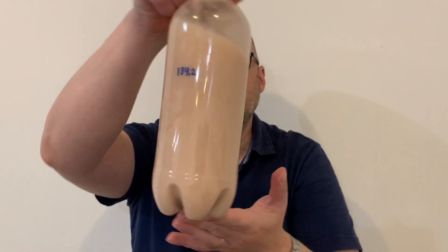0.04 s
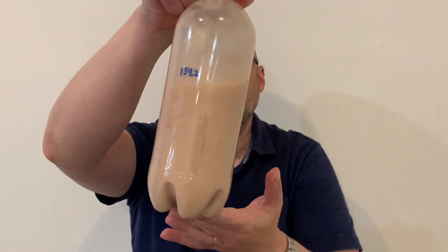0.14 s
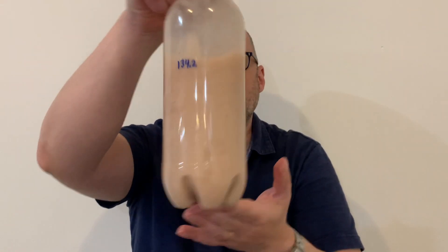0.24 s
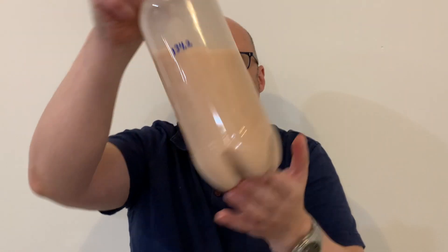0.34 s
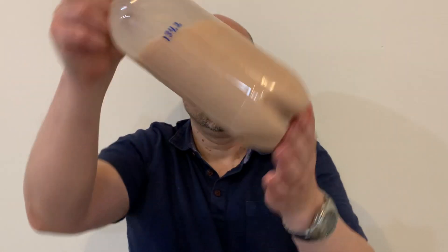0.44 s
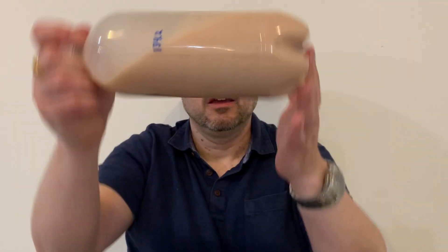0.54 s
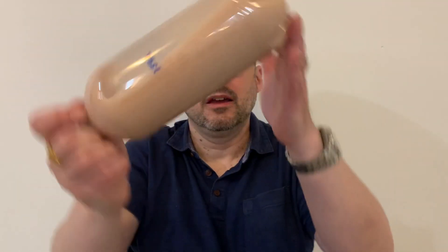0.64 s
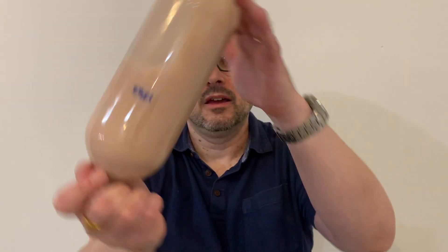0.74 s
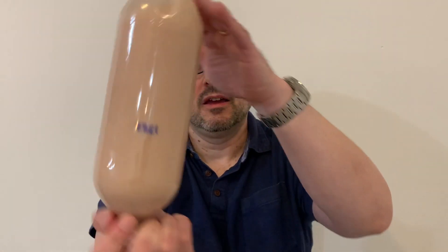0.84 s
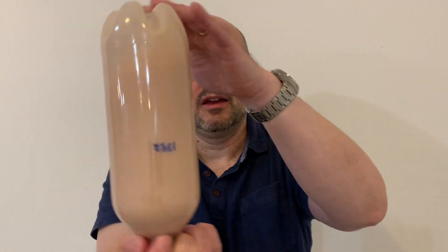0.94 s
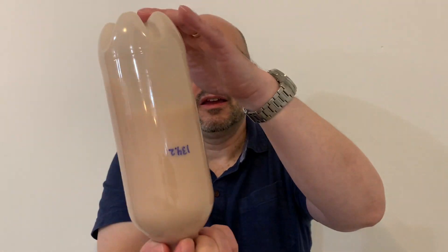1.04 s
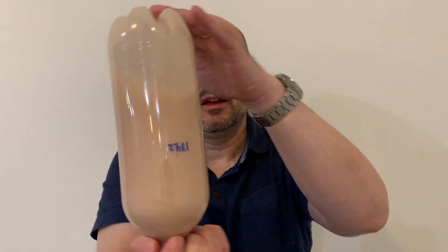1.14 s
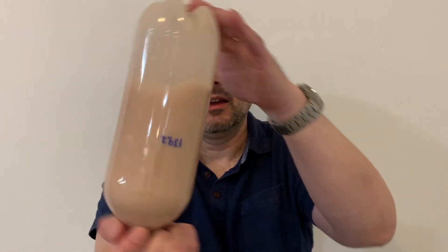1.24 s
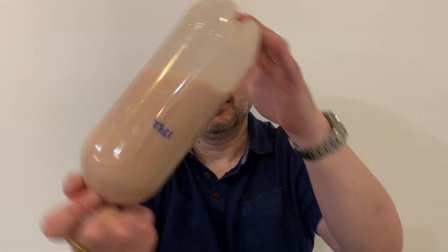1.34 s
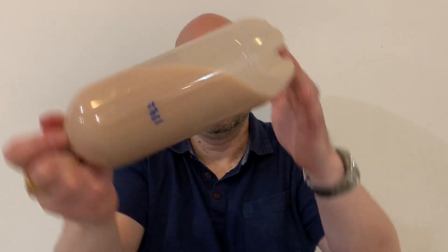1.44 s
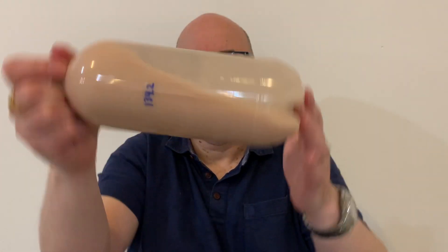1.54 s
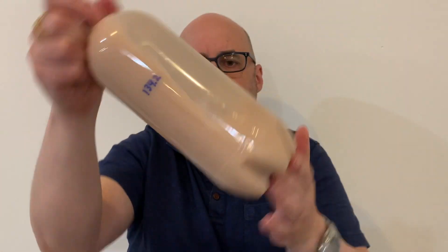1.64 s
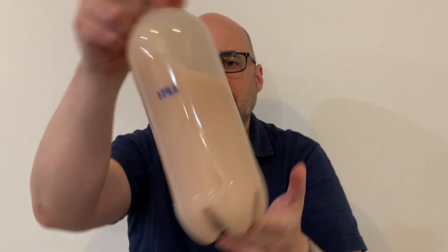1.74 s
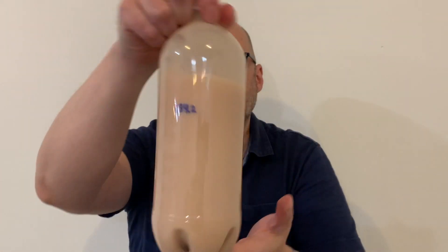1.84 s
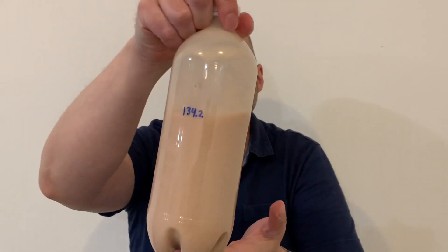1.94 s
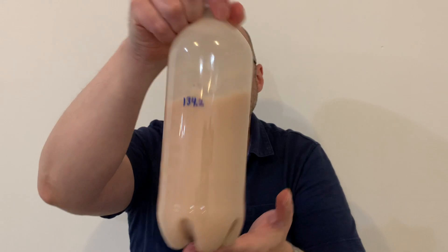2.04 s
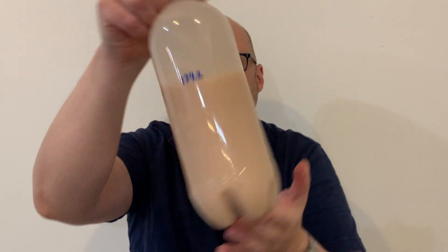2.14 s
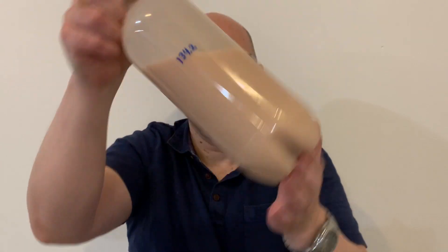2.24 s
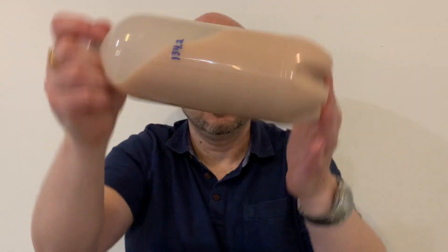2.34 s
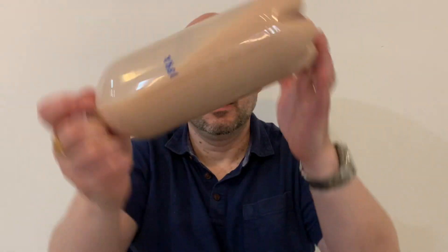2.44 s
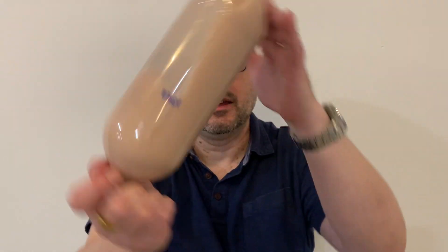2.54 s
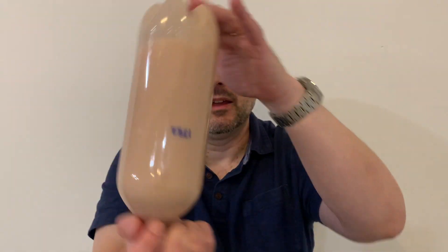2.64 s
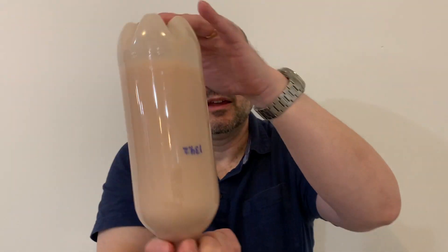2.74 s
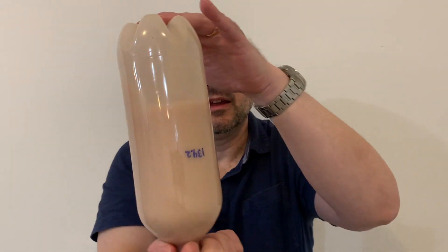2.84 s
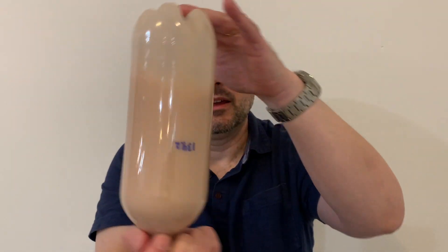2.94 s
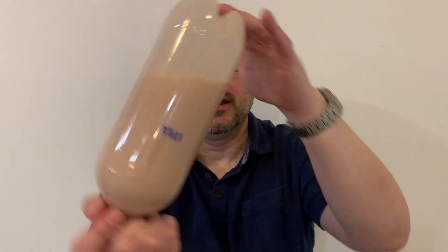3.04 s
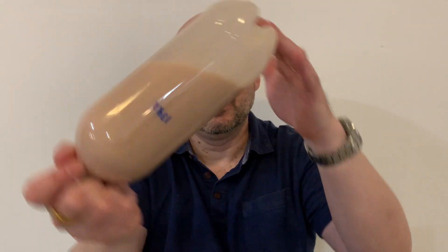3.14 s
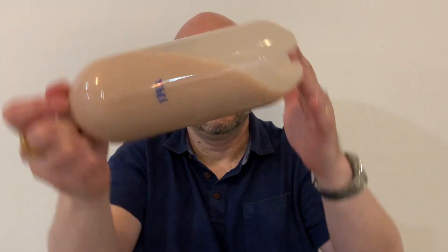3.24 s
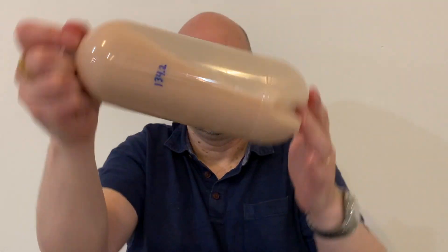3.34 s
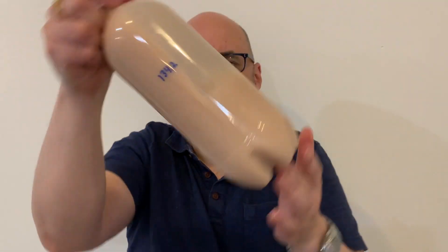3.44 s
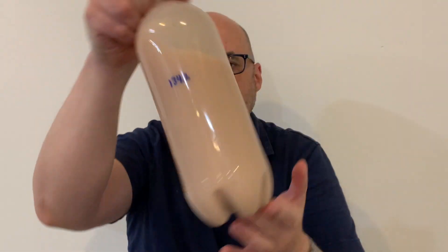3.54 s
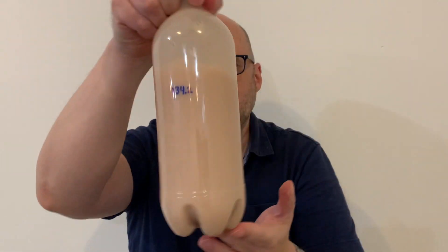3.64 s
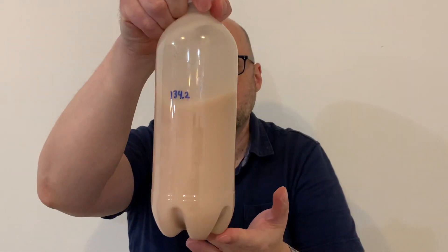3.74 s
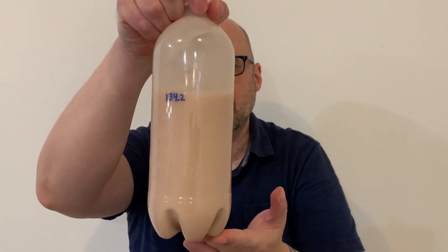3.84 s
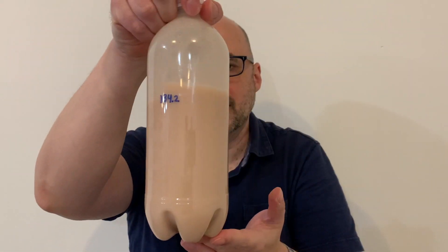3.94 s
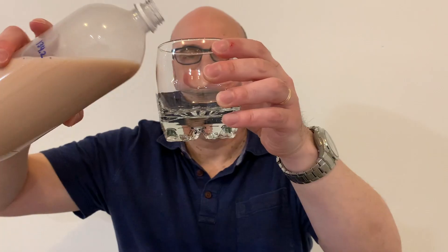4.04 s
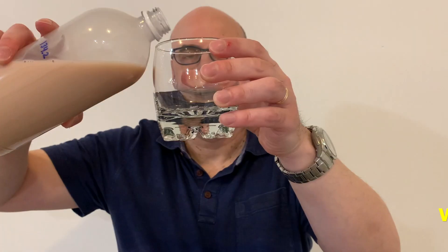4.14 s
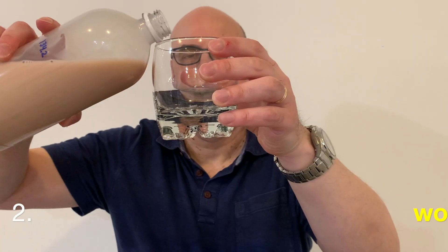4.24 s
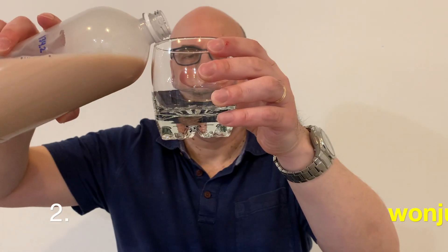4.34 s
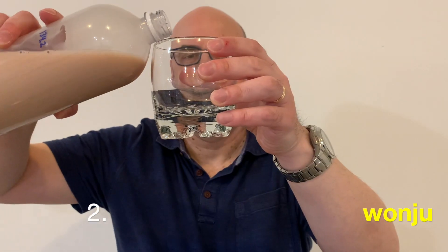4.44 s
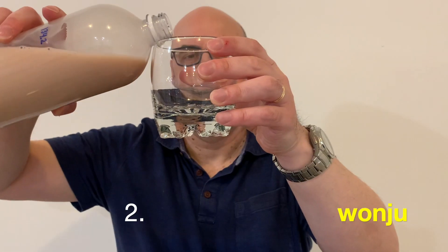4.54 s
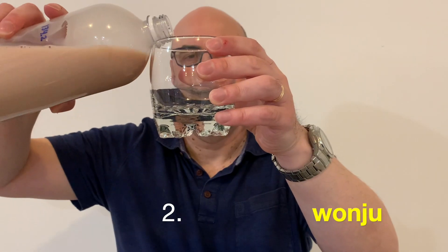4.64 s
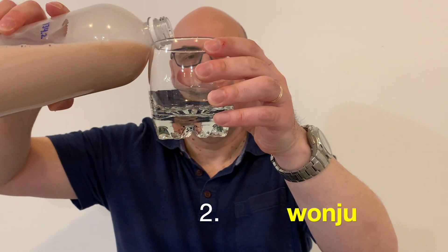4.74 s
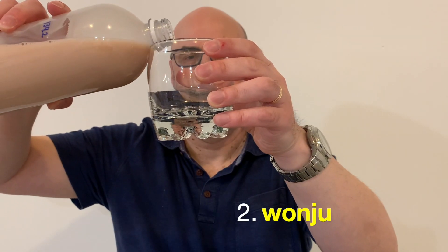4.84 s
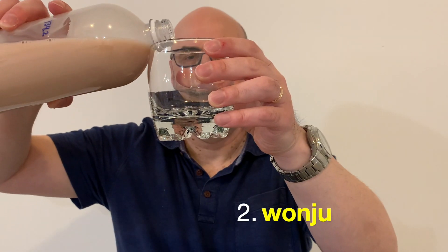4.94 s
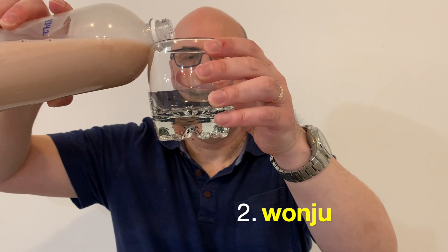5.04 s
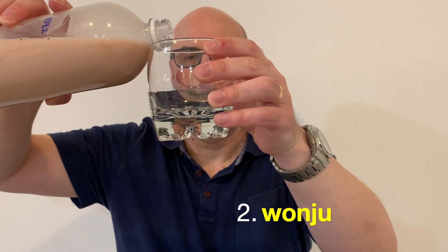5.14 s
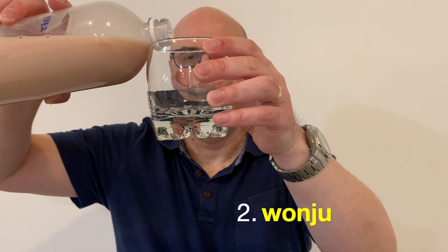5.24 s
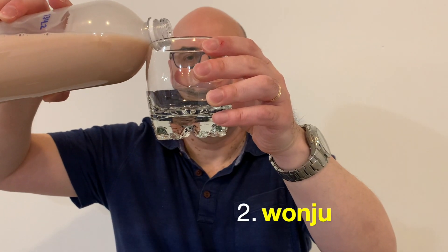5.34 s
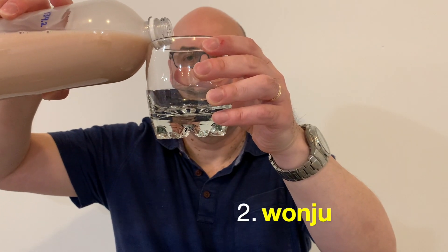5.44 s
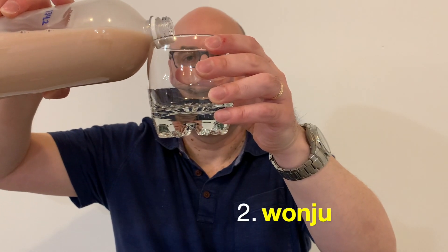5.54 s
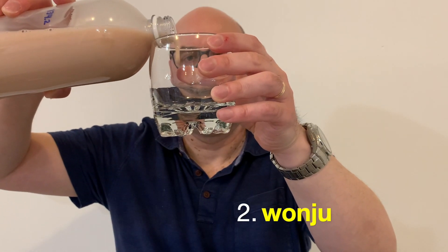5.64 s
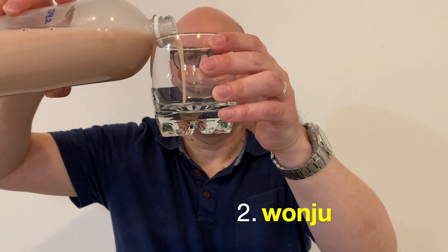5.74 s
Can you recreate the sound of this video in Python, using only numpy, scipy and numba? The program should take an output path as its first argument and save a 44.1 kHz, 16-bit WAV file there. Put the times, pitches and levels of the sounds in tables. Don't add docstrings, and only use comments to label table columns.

```python
import sys
import numpy as np
from scipy import signal
from scipy.fft import rfft, irfft
from scipy.io import wavfile
from scipy.ndimage import uniform_filter1d
from numba import njit

SR = 44100
rng = np.random.default_rng(int(sys.argv[2]) if len(sys.argv) > 2 else 0)


def boost_factor(decibels):
    exponent = np.asarray(decibels, float) / 20
    return 10 ** exponent


def dump_mix(stems):
    frames = np.atleast_2d(stems).T
    limited = np.clip(frames, -1, 1)
    pcm = np.round(limited * 32767).astype(np.int16)
    wavfile.write(sys.argv[1], SR, pcm)


N = 255763
T = np.arange(N) / SR
HZ = np.fft.rfftfreq(N, 1 / SR)


def unit(x):
    return x / np.sqrt(np.mean(x ** 2))


def over_hz(table):
    hz, value = np.transpose(table)
    return np.interp(np.log(HZ + 1), np.log(hz + 1), value)


def band(hz, width):
    shape = 1 / (1 + ((HZ - hz * hz / (HZ + 1)) / width) ** 2)
    return unit(irfft(rfft(rng.standard_normal(N)) * shape, N))


def walk(rate):
    k = int(SR / rate)
    steps = np.repeat(rng.standard_normal(N // k + 1), k)
    return unit(uniform_filter1d(uniform_filter1d(steps, k), k)[:N])


def spread(likeness):
    mid, side = rfft(rng.standard_normal((2, N)))
    c = np.clip(likeness, 0, 1)
    return np.sqrt(1 + c) * mid + np.sqrt(1 - c) * side * np.array([[1], [-1]])


@njit
def rings(start, hz, t60, size, glide, rise):
    out = np.zeros(N)
    for k in range(len(start)):
        span = t60[k] * SR
        fall, faster = 1000. ** (-.5 / span), 1000. ** (-1.5 / span ** 2)
        phase, a = 0., size[k]
        for i in range(min(int(span), N - start[k])):
            phase += 2 * np.pi * hz[k] * (1 + glide * i / span) / SR
            a, fall = a * fall, fall * faster
            swell = min(1., i * hz[k] / (rise * SR))
            out[start[k] + i] += a * swell * np.sin(phase)
    return out


def ring(s, hz, t60, db, glide, rise):
    return rings((s * SR).astype(np.int64), hz, np.clip(t60, .002, 1), boost_factor(db), glide, rise)


def burst(size, hz, share, t60, top_db, noise):
    t, f = np.arange(size) / SR, np.fft.rfftfreq(size, 1 / SR) + 1
    spectrum = rfft(noise)
    sputter = boost_factor(3.3 * unit(irfft(spectrum / (1 + (f / 120) ** 2))))
    width = hz * max(share, .03)
    body = unit(irfft(spectrum / (1 + ((f - hz * hz / f) / width) ** 2) ** 1.3))
    top = boost_factor(top_db) * unit(irfft(spectrum / (1 + (10500 / f) ** 8)))
    fall = np.exp(-np.log(1000) * t / max(t60, .004))
    body *= sputter * fall
    body *= 1.1 * np.sqrt(np.sum(fall ** 2) / np.sum(body ** 2))
    attack = np.minimum(t / min(0.0018, 3 / hz), 1)
    return (body + top * fall ** 2) * attack / 2.22


def puffs(rows):
    size = 8192
    out = np.zeros(N + size)
    for (s, db, hz, share, t60, top_db), noise in zip(rows, rng.standard_normal((len(rows), size))):
        start = int(s * SR)
        out[start:start + size] += boost_factor(db) * burst(size, hz, share, t60, top_db, noise)
    return out[:N]


# (time [s], peak [dB], pitch [Hz], splash over pop [dB])
POPS = [(0.054, -33, 774, 1), (0.111, -32, 1114, -2), (0.154, -52, 1665, 0), (0.184, -51.5, 1950, 1),
        (1.577, -26.5, 620, -14), (1.615, -12.5, 537, -14.5), (1.6167, -18.5, 1040, -23.5),
        (1.621, -19, 705, -16.5), (1.63, -24, 870, -21), (1.626, -9.5, 825, -20),
        (1.652, -40, 940, 2.5), (1.685, -30, 1275, -5), (1.698, -38, 1180, 1),
        (1.728, -33.5, 1446, -1), (1.852, -28, 1010, -2.5), (3.289, -55.5, 717, 4),
        (3.354, -22.5, 635, -13), (3.4024, -12, 680, -20), (3.449, -36, 2180, -5),
        (3.4708, -21.5, 1310, -14.5), (3.473, -19.5, 1170, -19.5), (3.521, -36.5, 940, -4.5),
        (3.616, -56, 1160, 2), (3.666, -33.5, 880, -5.5), (3.697, -47.5, 1055, 11),
        (3.842, -60, 1120, 0), (4.696, -45.5, 503, 2), (4.926, -41.5, 730, -1),
        (0.709, -26.5, 884, -23), (0.769, -28, 752, -11), (0.82, -49, 1450, -1),
             (0.86, -44, 1124, 2.5), (0.921, -44, 1294, -13), (0.963, -52, 945, 8.5),
             (1.038, -49, 860, -13), (2.47, -39.5, 904, -11), (2.492, -48, 700, 13.5),
             (2.506, -37.5, 820, -20), (2.534, -41, 830, -13), (2.552, -47.5, 1190, 4.5),
             (2.579, -54, 710, -10), (2.601, -45, 780, 6.5), (2.639, -47, 1230, 7.5),
             (2.749, -41.5, 1050, 4.5), (2.808, -41, 1090, -1), (2.851, -30, 1230, -24),
             (2.87, -38, 1274, -8), (2.904, -45, 840, -2)]
# (pitch ratio, level [dB])
PARTIALS = [(1.5, -13), (0.47, -11), (1.6, -27.5)]


def pops():
    s, db, hz, splash_db = np.transpose(POPS)
    s = s + 0.000966
    t60 = 0.03 * boost_factor(-0.27 * (db + 39.5))
    out = ring(s, hz, t60, db, 0.14, 1.1)
    for ratio, part_db in PARTIALS:
        detune = 1 + 0.11 * rng.standard_normal(len(s))
        out += ring(s, hz * ratio * detune, t60 / 2, db + part_db, -0.058, 0.28)
    return out + puffs([(a, b, 1.097 * c, 1.4, 0.1, -50) for a, b, c in zip(s, db + splash_db, hz)])


# (time [s], peak [dB], pitch [Hz], ring t60 [s])
THUMPS = [(0.707, -39, 307, 0.2), (0.769, -26.5, 467, 0.034), (1.578, -32, 364.6, 0.18),
          (1.629, -19, 190, 0.017), (2.491, -29.5, 278, 0.12), (2.533, -35.5, 362, 0.061),
          (2.75, -37.5, 406, 0.072), (2.907, -42.5, 413, 0.055), (3.355, -27.5, 357.7, 0.18),
          (3.402, -18.5, 445, 0.045), (4.7, -31, 239.4, 0.32), (4.926, -45.5, 244, 0.12)]


def thumps():
    s, db, hz, t60 = np.transpose(THUMPS)
    first = ring(s, hz, 0.69 * t60, db, 0.019, 1.7)
    return first + ring(s, 1.2 * hz, 0.71 * t60, db - 11.0, 0.0088, 0.52)


def swarm(rate, low_hz, high_hz, cycles, scatter_db, tilt_db):
    when, size, loud, life = rng.random((int(rate * N / SR), 4)).T
    hz = low_hz * (high_hz / low_hz) ** size
    db = -scatter_db * np.log(1.01 - loud) + tilt_db * size
    return unit(ring(when * (N - 1) / SR, hz, cycles * (0.72 + life) / hz, db, 0.088, 0.28))


def waves(s, hold, db, t60):
    s, hold, db = s[:, None], hold[:, None], db[:, None]
    rise = np.clip((T - s) / 0.029 + 1, 0, 1)
    return np.sum(rise * boost_factor(db - 60 * np.maximum(T - s - hold, 0) / t60), axis=0)


# (time [s], hold [s], bubbling [dB], spray [dB])
WAVES = [(0.022, .13, -57.5, -65.5), (0.728, 0.068, -50.5, -60.5), (0.868, 0.022, -71, -71.5),
         (0.93, 0.077, -58, -67.5), (1.612, 0.1, -58, -59), (1.716, 0.1, -62.5, -70),
         (1.849, 0.07, -55, -63.5), (2.481, 0.026, -59, -66), (2.57, 0.11, -57, -67),
         (2.734, 0.13, -58.5, -71.5), (3.391, 0.15, -61.5, -63), (3.644, 0.059, -56.5, -71.5),
         (0.21, 0.15, -81, -93), (1.026, 0.046, -75, -92), (1.464, .1, -74, -96),
         (2.02, 0.066, -75.5, -81.5), (2.925, 0.11, -76.5, -101), (3.302, 0.042, -73, -87),
         (3.475, 0.029, -59.5, -62.5), (3.685, 0.046, -70.5, -65.5), (3.76, 0.14, -82, -98),
         (4.93, .06, -84, -89)]


def froth():
    s, hold, bubble_db, spray_db = np.transpose(WAVES)
    flow = 1.5 * walk(40)
    bubble_gain = waves(s, hold, bubble_db, 0.28) * boost_factor(flow + 2 * walk(50))
    spray_gain = waves(s, hold, spray_db, 0.13) * boost_factor(flow + 3 * walk(60))
    mist_gain = waves(s, hold, spray_db - 14.5, 0.1) * boost_factor(flow + 5 * walk(30))
    bubbles = swarm(800, 650, 2700, 18, 2.8, -3) + boost_factor(-2.0) * band(1300, 1900)
    spray = swarm(800, 2396, 7920, 30, 1.31, -12) + boost_factor(-14.0) * band(7900, 6000)
    mist = swarm(810, 6600, 13000, 48.5, 1.6, -5.5) + boost_factor(-18.0) * band(13790, 7938)
    return boost_factor(-1.5) * bubble_gain * bubbles + boost_factor(5.5) * spray_gain * spray + boost_factor(8.0) * mist_gain * mist


# (time [s], peak [dB], pitch [Hz], ring t60 [s])
DROPS = [(0.037, -29, 1593, 0.045), (3.4008, -23.5, 1083, 0.012), (0.303, -52, 1566, 0.028),
         (0.408, -52.5, 2250, 0.015), (0.764, -39, 2370, 0.026), (0.793, -50, 3950, 0.039),
         (0.9598, -45, 1795, 0.048), (1.083, -46, 2680, 0.021), (1.085, -53, 704, 0.04),
         (1.563, -54, 2730, 0.038), (1.649, -33, 2300, 0.03), (1.7344, -53, 1630, 0.072),
         (1.9296, -45, 2190, 0.032), (2.574, -46.5, 1810, 0.03), (2.603, -38.5, 2670, 0.024),
         (2.735, -40, 2020, 0.031), (2.761, -54, 1747, 0.044), (2.779, -39.5, 1620, 0.035),
         (2.901, -41, 1804, 0.045), (2.998, -58, 1770, 0.048), (3.055, -57.5, 2005, 0.021),
         (3.402, -35, 2310, 0.016), (3.4315, -42, 2174, 0.04), (3.565, -38, 1310, 0.024),
         (3.5772, -40.5, 1635, 0.025), (3.775, -43.5, 2117, 0.015), (3.905, -63, 3980, 0.036),
         (4.161, -56, 1123, 0.032), (5.159, -58, 3230, 0.052), (5.163, -53.5, 883, 0.072),
         (0.74, -39, 4100, 0.033), (.74, -40, 4700, 0.033), (.878, -58, 1960, .03),
         (.893, -49, 1580, 0.062), (.944, -47, 1040, 0.035), (.984, -44, 2010, 0.037),
         (1.013, -52, 1820, .04), (1.044, -52.5, 2100, 0.028), (1.604, -57, 1080, 0.017),
         (1.745, -42, 1365, 0.033), (2.583, -45.5, 1900, 0.018), (2.624, -49, 1210, .03),
         (2.672, -49, 800, 0.043), (2.69, -64, 900, 0.029), (2.859, -45, 910, .03),
         (2.958, -62, 1480, 0.034), (3.387, -48, 1084, 0.018), (3.411, -46, 1100, 0.024),
         (3.484, -50, 1214, 0.046), (2.658, -58, 6750, 0.018)]


def drops():
    s, db, hz, t60 = np.transpose(DROPS)
    spray = puffs([(a, b - 5.5, c, .45, 0.089, -50) for a, b, c in zip(s, db, hz)])
    return ring(s, hz, t60, db, 0.068, 1.0) + spray


# (time [s], peak [dB], pitch [Hz], ring t60 [s])
BLIPS = [(.724, -45, 3030, .02), (.782, -45, 1970, .025), (.875, -49, 2580, .015), (1.353, -64, 3080, .02),
         (1.452, -63, 1500, 0.017), (1.483, -62.5, 1200, 0.026), (1.499, -59, 1050, .03),
         (1.525, -54, 1100, 0.019), (1.546, -55, 900, .025), (1.603, -49, 2530, 0.014),
         (1.622, -32, 2380, .02), (1.663, -38, 3330, 0.016), (1.663, -39, 4220, .015),
         (1.711, -40, 2390, .02), (1.948, -51, 2800, 0.017), (1.972, -57, 2220, .04),
         (2.037, -47, 2220, 0.024), (2.491, -39, 1500, 0.017), (2.508, -50, 2610, 0.016),
         (2.551, -46, 1690, .025), (2.748, -42, 690, 0.033), (2.955, -58, 1300, 0.026),
         (2.998, -58, 940, 0.027), (3.368, -50, 1300, 0.011), (3.437, -40, 2970, 0.022),
         (3.471, -27, 2390, .015), (3.473, -47, 3900, .03), (3.489, -53, 5630, .02),
         (3.492, -44, 6400, 0.021), (3.614, -48, 1970, 0.017), (3.697, -51, 3980, .02),
         (3.701, -52, 5020, .02), (3.728, -46, 2610, .02), (3.814, -59, 1300, .03), (3.904, -56, 3990, .02),
         (1.76, -44, 4250, .02), (.135, -48, 3790, .02), (4.707, -48, 6000, .015)]


def blips():
    s, db, hz, t60 = np.transpose(BLIPS)
    return ring(s, hz, t60, db, .05, 1.5)


# (time [s], peak [dB], centre [Hz], width share, t60 [s])
SLAPS = [(0.126, -39.5, 9200, 0.34, 0.041), (.214, -55, 9000, 1.5, .012), (.239, -53, 10300, 0.57, 0.017),
         (.607, -60, 4300, .8, 0.23), (3.633, -43, 9300, 0.21, 0.053), (5.158, -70, 3008, 1.46, 0.051),
         (0.624, -37.5, 4400, .7, 0.011), (1.663, -24.5, 15000, 0.18, 0.013),
         (2.0066, -34, 2200, 0.8, 0.023), (2.009, -39, 1940, 0.52, 0.18), (3.386, -34.5, 14400, 1.2, 0.008),
         (3.532, -29, 14900, 0.25, 0.007), (4.047, -55.5, 2420, 1.54, 0.015), (4.699, -49, 1200, 2.6, 0.1),
         (4.933, -54, 6000, 2.4, 0.08), (4.926, -42.5, 496, 1.2, 0.2)]


def slaps():
    return puffs([(*row, -33.5) for row in SLAPS])


# (time [s], peak [dB], centre [Hz], width [Hz])
SNAPS = [(.188, -48, 2200, 2500), (.41, -43, 4070, 1500), (0.6262, -43, 5000, 4000),
         (0.74, -37, 7500, 3000), (.769, -44, 5080, 1200), (1.354, -46, 1800, 2000),
         (1.517, -39, 3000, 4000), (1.58, -41, 3500, 5000), (1.664, -26, 8700, 2500),
         (1.872, -44, 11000, 9000), (1.872, -44, 2500, 2500), (2.472, -37, 9000, 7000),
         (2.485, -45, 9000, 7000), (2.571, -37, 11000, 6000), (2.604, -44, 12500, 6000),
         (2.903, -35, 9000, 7000), (3.2902, -48, 5600, 1300), (3.2915, -45, 3500, 6000),
         (3.387, -46, 6000, 6000), (3.474, -38, 7300, 3000), (3.481, -37, 8300, 1994),
         (3.568, -46, 4800, 2000), (4.701, -39, 3400, 5100), (4.926, -42, 1100, 1200),
         (2.0067, -22, 1850, 600), (4.926, -46, 6000, 6000), (4.699, -41, 6500, 3000),
         (.128, -42, 7000, 5000)]


def snaps():
    out, t = np.zeros(N), T[:256]
    for s, db, hz, width_hz in SNAPS:
        start, pace = int(s * SR), 5 * width_hz * t
        out[start:start + len(t)] += boost_factor(db) * pace * np.exp(1 - pace) * np.sin(2 * np.pi * hz * t)
    return out


# (time [s], peak [dB], centre [Hz], t60 [s])
SPATTERS = [ (0.706, -51, 5970, 0.028), (0.737, -42, 4400, 0.08), (0.96, -43, 7600, 0.087),
            (1.514, -41.5, 6600, 0.016), (1.5784, -56, 6900, 0.037), (1.614, -40, 5800, 0.057),
            (1.761, -49, 4080, 0.18), (1.921, -45, 5414, 0.019), (2.0072, -59, 3270, 0.061),
            (2.4705, -41, 4670, 0.067), (2.566, -41, 3720, 0.053), (2.674, -41.5, 4500, 0.023),
            (2.761, -48, 5380, 0.071), (2.851, -50, 5800, 0.041), (2.899, -52, 4740, 0.07),
            (3.356, -55, 6660, 0.036), (3.402, -37, 4440, 0.037), (3.564, -50.5, 4730, 0.08),
            (3.6745, -55, 6560, 0.049), (3.699, -40.5, 6660, 0.03), (3.904, -63, 4000, 0.04),
            (4.697, -38.5, 4600, 0.018)]


def spatters():
    rows = []
    for s, db, hz, t60 in SPATTERS:
        share = max(.14, 0.67 * boost_factor(2 * (db + 40.0)))
        rows.append((s, db, hz, share, t60, -28.5))
    return puffs(rows)


# (time [s], peak [dB], centre [Hz], top octave [dB])
CREAKS = [(0.1256, -45, 3660, -8), (0.409, -52.5, 3850, 3), (0.768, -43, 5550, 1),
          (0.836, -44.5, 5900, 6.5), (0.923, -56.5, 4000, 20), (1.661, -39, 7100, -41),
          (1.8473, -50, 5250, -30), (1.869, -41, 7200, -54), (2.602, -51.5, 3840, 12), (3.29, -55, 5730, 6),
          (3.3867, -64.5, 4790, 2), (3.4726, -40, 4200, 3.5), (3.529, -52, 3940, 2.5),
          (4.925, -58, 4994, 24)]


def creaks():
    return puffs([(s, db, hz, 0.45, 0.068 * boost_factor(0.6 * (db + 48)), top_db) for s, db, hz, top_db in CREAKS])


# (time [s], peak [dB], centre [Hz])
TICKS = [(.188, -48, 2500), (.255, -53, 7760), (0.74, -30.5, 6440), (.786, -53, 6400), (.803, -48, 5600),
         (.853, -39, 5500), (0.866, -42, 5030), (.868, -47, 6900), (.885, -45, 4000), (0.989, -35, 4300),
         (1.057, -47, 3760), (1.102, -53, 10500), (1.75, -45, 7000), (1.829, -55, 10900),
         (1.967, -54, 9700), (2.471, -33, 6440), (2.495, -43, 4030), (2.51, -42, 4900), (2.596, -45, 7000),
         (2.66, -51, 6800), (2.72, -47, 4300), (2.80, -54, 4100), (2.813, -50, 7600), (2.876, -51, 10370),
         (3.44, -38, 7200), (3.472, -30.5, 9050), (3.49, -41, 10490), (3.505, -42, 10000),
         (3.568, -57, 5940), (3.292, -43, 5740), (.838, -47, 5800), (1.578, -48, 10500), (1.921, -38, 7460),
         (2.006, -47.5, 8800)]


def ticks():
    return puffs([(s, db, hz, 0.24, 0.0092, -29) for s, db, hz in TICKS])


def room(x):
    likeness = np.clip((HZ / 8000) ** 4, .3, .9)
    fall = np.exp(-np.log(1000) * T / .22)
    tail = irfft(spread(likeness) / (1 + HZ / 5000), N) * fall * (T > .004)
    tail *= boost_factor(-19) / np.sqrt(np.mean(np.sum(tail ** 2, axis=1)))
    return x + signal.fftconvolve(x[None], tail[:, :SR // 2])[:, :N]


def scatter(x, count=4):
    middle = 1 / (1 + ((HZ - 4200) / 2000) ** 6)
    colour = .3 + .7 * middle
    out = -0.25 * irfft(rfft(x) * middle, N)
    for _ in range(count):
        echo = irfft(spread(0.) * colour, N)[:, :1024] * np.exp(-T[:1024] / 0.0012)
        echo *= boost_factor(-13.5) / np.sqrt(np.sum(echo ** 2, axis=1, keepdims=True))
        out = out + walk(9) * signal.fftconvolve(x[None], echo)[:, :N]
    return out


# (pitch [Hz], lead [radians])
PORT_LEAD = [(0, 0), (1000, .6), (2000, 1.6), (3200, 2.8), (4500, 4.7), (6300, 5.6), (7200, 5.0),
             (8100, 3.4), (8900, 3.0), (10300, .1), (11700, -.1), (13000, -3.0), (13900, -3.3),
             (15200, -6.28)]


def ports(x, pan):
    lead = np.interp(HZ, *np.transpose(PORT_LEAD))
    half = boost_factor(over_hz(pan) / 2) * np.exp(.5j * lead)
    return irfft(rfft(x) * np.array([half, 1 / half]), N)


# (pitch [Hz], left minus right [dB])
BOTTLE_PAN = [(200, -1.5), (400, 2), (900, 5), (1400, 3.5), (2200, -1.5), (4000, -2.5), (5300, -5),
              (6500, -1), (8000, 0)]
# (time [s], left minus right [dB])
SWAY = [
    (0, -2.5),
    (.7, 0),
    (1.6, 0.5),
    (2.5, 1),
    (3.4, 0.5),
    (4.7, 0.5),
    (4.9, -1),
]


def bottle():
    liquid = pops() + thumps() + froth() + drops() + blips()
    plastic = slaps() + snaps() + spatters() + creaks() + ticks()
    dry_bottle = liquid + plastic
    sway = boost_factor(np.interp(T, *np.transpose(SWAY)) / 2)
    return ports(room(dry_bottle) + scatter(dry_bottle), BOTTLE_PAN) * np.array([sway, 1 / sway])


# (peak time [s], half length [s], pitch [Hz], level [dB])
RUMBLE = [(0.214, 0.13, 58.63, -54.5), (0.51, 0.15, 58.6, -47.5), (0.763, 0.052, 61.99, -68),
          (1.016, 0.04, 62.8, -42.5), (1.268, 0.028, 64.96, -50.5), (1.707, 0.049, 60.39, -47),
          (1.97, 0.12, 65.01, -46.5), (2.312, 0.18, 61.53, -42.5), (2.725, 0.06, 61.12, -40.5),
          (3.109, 0.12, 62.42, -48), (3.36, 0.12, 61.92, -45), (3.619, 0.13, 61.39, -53),
          (4.101, 0.14, 62.22, -46), (4.536, 0.059, 57.6, -43.5), (4.94, 0.085, 61.96, -41),
          (5.221, 0.078, 63.32, -41.5), (5.723, 0.16, 60.47, -48)]
# (pitch [Hz], width [Hz], level [dB])
HUM = [(121.4, 4.5, -62.5), (172.7, 39, -65), (90.8, 11, -56.5), (40.76, 7.9, -65)]


def hum():
    s, half, hz, db = np.transpose(RUMBLE)
    swell = boost_factor(-55) + boost_factor(db) @ np.exp(-((T - s[:, None]) / half[:, None]) ** 2)
    duct = np.sqrt(2) * swell * np.sin(2 * np.pi * np.cumsum(np.interp(T, s, hz)) / SR)
    mains = sum(boost_factor(db) * band(hz, width) for hz, width, db in HUM)
    apart = boost_factor(-66.0) * band(62, 7.5) + boost_factor(-65.0) * band(120, 12)
    return duct + mains + apart * np.array([[1], [-1]])


# (time [s], pitch [Hz], level [dB])
MAINS_LINE = [
    (0.0, 120.1, -53),
    (5.39, 120.5, -53),
    (5.8, 119.8, -50.5),
]


def mains_line():
    s, hz, db = np.transpose(MAINS_LINE)
    phase = 2 * np.pi * np.cumsum(np.interp(T, s, hz)) / SR
    return np.sqrt(2) * boost_factor(np.interp(T, s, db)) * np.sin(phase)


# (pitch [Hz], level per Hz [dB])
AIR = [(22, -34), (45, 6.5), (100, 3.5), (200, -4), (320, -15), (600, -25), (1200, -35), (2500, -39),
       (5000, -44), (8000, -44.5), (12000, -43.5), (16000, -44)]
# (pitch [Hz], share [0-1])
LIKENESS = [(60, .93), (300, .88), (700, .2), (1600, .1), (3000, .4), (4000, .1), (6000, .15), (7200, .5),
            (8200, .97), (16000, .97)]


def air():
    wash = unit(irfft(spread(over_hz(LIKENESS)) * boost_factor(over_hz(AIR)), N))
    return boost_factor(-49.5 + walk(4.0) / 2) * wash


# (pitch [Hz], left minus right [dB])
PORT_PAN = [(60, -2.7), (200, -2.2), (700, .8), (1600, 1.5), (2800, -.5), (5500, -1.3), (8000, 0)]


def background():
    return ports(hum() + mains_line() + air(), PORT_PAN)


def scene():
    return bottle() + background()


def band_limit(x):
    return signal.sosfilt(signal.butter(12, 16990, fs=SR, output="sos"), x)


def record(dry):
    mix = irfft(rfft(dry) * (boost_factor(-40) + 1 / (1 + (HZ / 15850) ** 200)), N)
    return band_limit(mix)


dry = scene()
out = record(dry)
dump_mix(out)
```